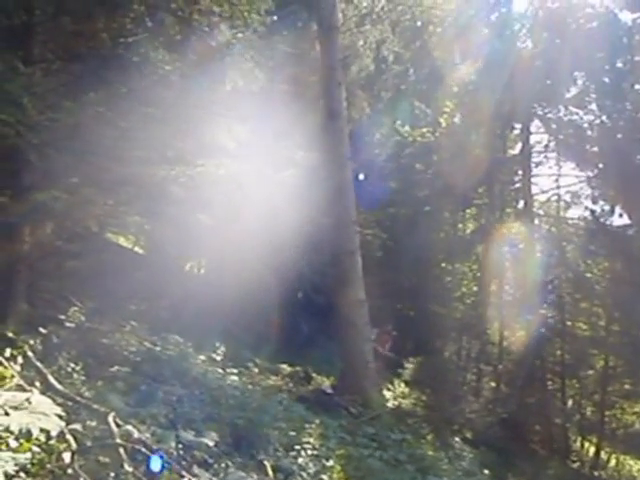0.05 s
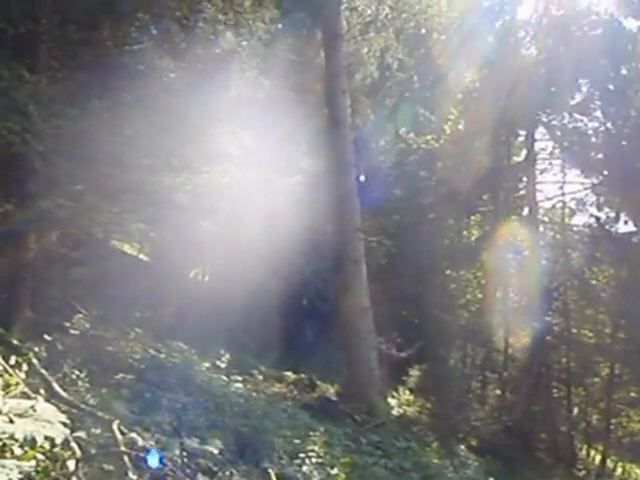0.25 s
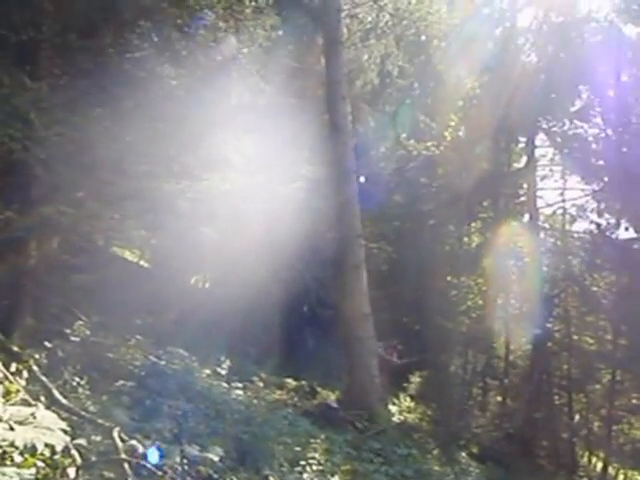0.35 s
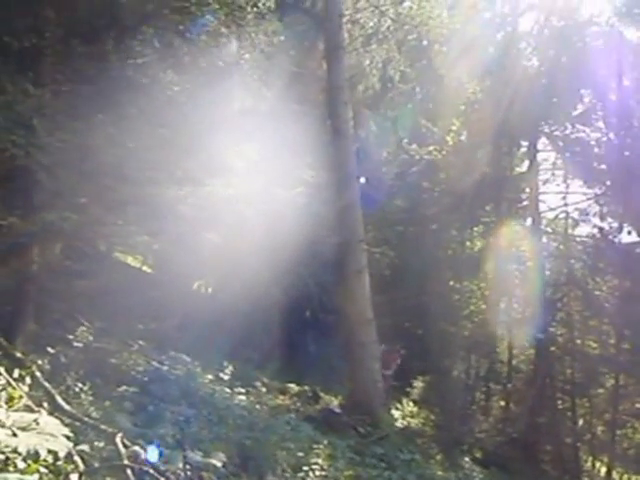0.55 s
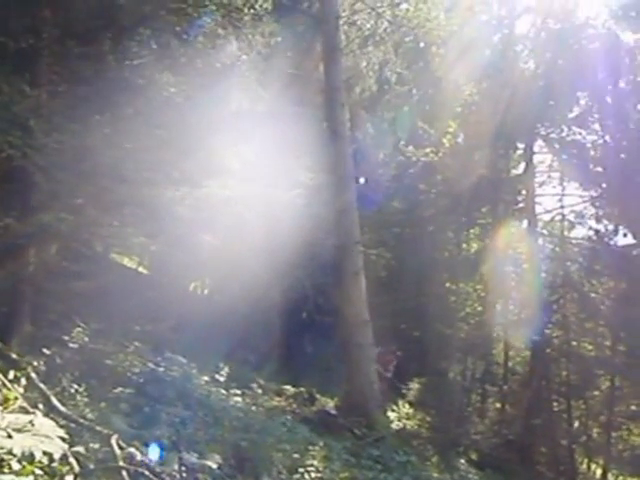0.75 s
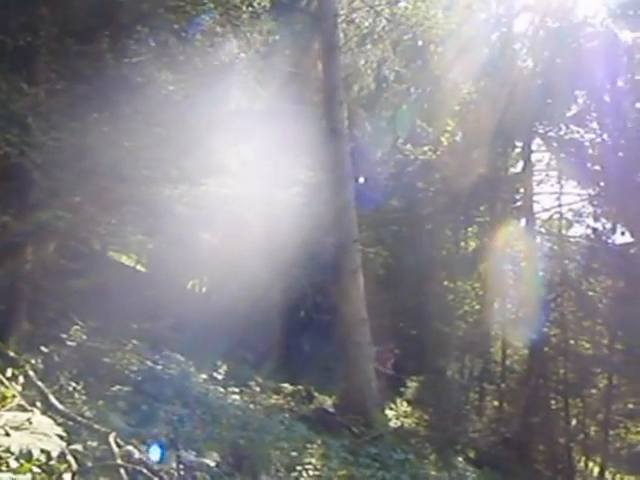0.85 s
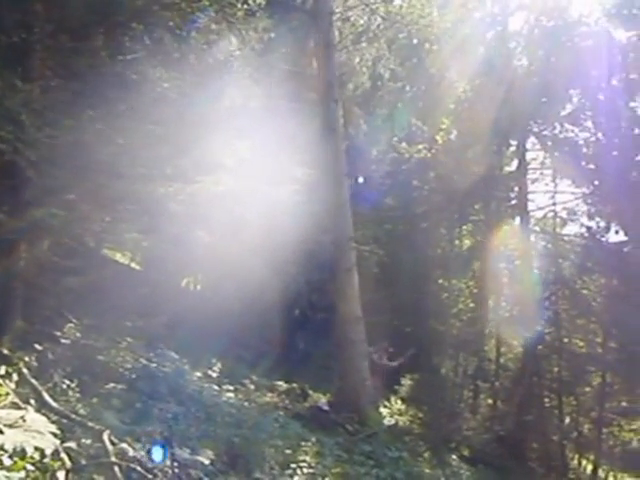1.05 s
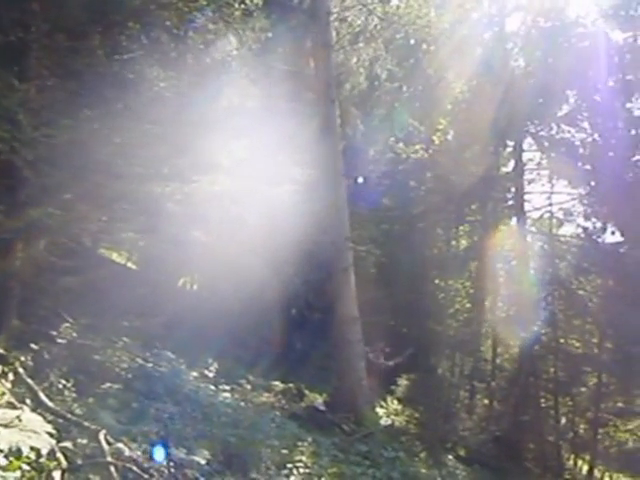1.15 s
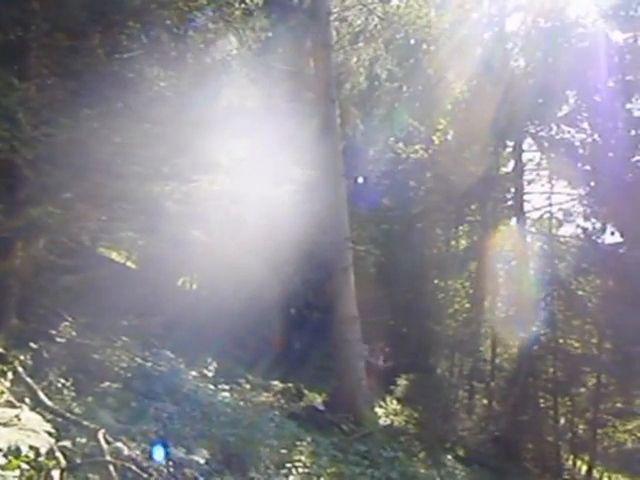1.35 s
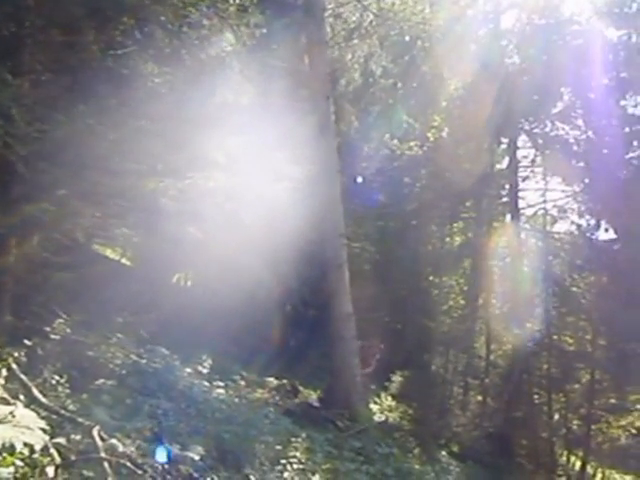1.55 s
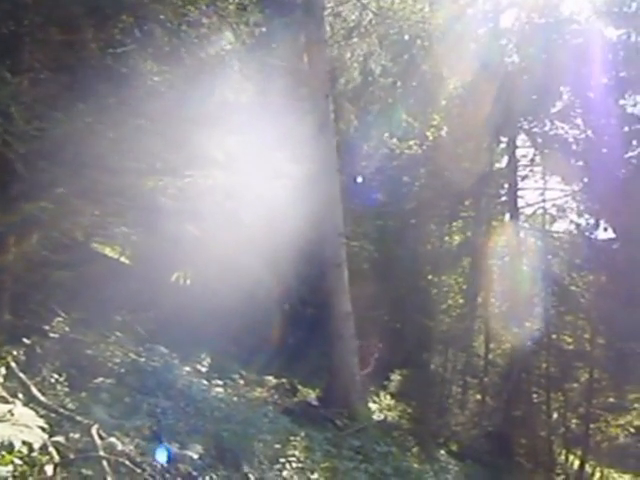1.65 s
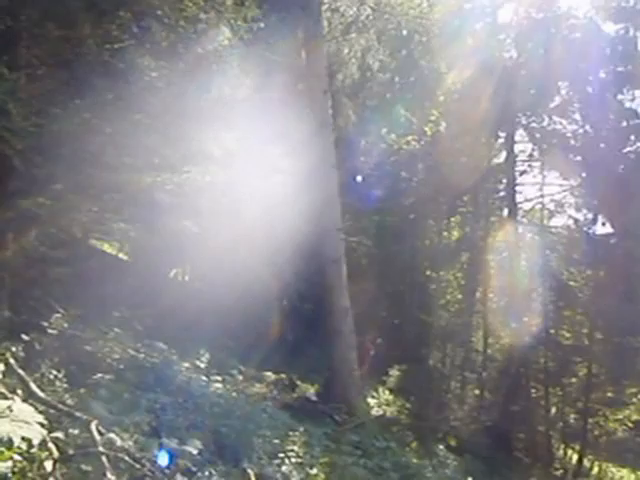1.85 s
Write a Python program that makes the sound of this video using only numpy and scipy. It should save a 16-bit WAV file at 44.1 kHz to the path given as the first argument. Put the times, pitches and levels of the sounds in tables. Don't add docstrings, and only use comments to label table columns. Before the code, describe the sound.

A hard, clipped knock close on the microphone, then a fainter wooden knock far off in woods

```python
import sys
import numpy as np
from scipy import signal
from scipy.fft import rfft, irfft
from scipy.io import wavfile
from scipy.ndimage import uniform_filter1d

SR = 44100
rng = np.random.default_rng(int(sys.argv[2]) if len(sys.argv) > 2 else 0)


def volts_from_decibels(level):
    exponent = np.asarray(level, float) / 20
    return 10 ** exponent


def transcribe(u):
    v = np.clip(np.atleast_2d(u).T, -1, 1)
    q = np.round(v * 32767).astype(np.int16)
    wavfile.write(sys.argv[1], SR, q)


N = 83790

# f/Hz, level/dB
HISS_SPECTRUM = [(20, -4), (120, 1.6), (280, -3), (500, -8), (950, -4), (1500, -5), (3000, 0), (4000, 3)]
HISS_DB = -59.5

# start t/s, length t/s, f/Hz, level/dB
BIRD_NOTE = (1.699, .028, 2670, -57)

# f/Hz, level/dB
TREE_SPECTRUM = [(300, -21.5), (900, -1), (2000, 0), (3500, -12)]
TREES_T60_S = 1.2

# f/Hz, level/dB, t60/s
WOOD_MODES = [(720, -12, .015), (995, -1, .018), (1339, -2, .0045), (1935, -7, .017), (3135, -15, .012),
              (3430, -12, .011)]

# t/s, level/dB
BLOW_ARRIVALS = [
    (1.0623, -30),
    (1.06273, -18),
    (1.06344, -21),
    (1.06551, -30),
    (1.06787, -36),
    (1.07487, -35),
    (1.07597, -40),
]

# t/s, height/full scale, rise t/s
PRESSURE_STEPS = [
    (.24547, 2.07, .00009),
    (.24716, -2.12, .00011),
]

# t/s, height/full scale, length t/s, f/Hz
HOUSING_FLEXES = [
    (.1940, .002, .0016, 0),
    (.24500, -.33, .00016, 1700),
    (.24554, .09, .00006, 0),
    (.24693, .24, .00008, 0),
    (.24618, .06, .0001, 0),
    (.2662, .011, .0013, 0),
    (.2742, -.009, .001, 0),
    (1.355, .001, .0012, 0),
    (1.568, .001, .0012, 0),
]

CONVERTER_STEP = 0.69 / 128


def coloured(points):
    f, level_db = np.transpose(points)
    hz = np.fft.rfftfreq(N, 1 / SR)
    gain = volts_from_decibels(np.interp(np.log(hz + 1), np.log(f), level_db))
    in_band = (hz < 4000) * (hz > 8)
    noise = irfft(rfft(rng.standard_normal(N)) * gain * in_band, N)
    return noise / np.sqrt(np.mean(noise ** 2))


def hiss():
    return volts_from_decibels(HISS_DB) * coloured(HISS_SPECTRUM)


def tree_wash(start_s, level_db):
    since = np.arange(N) / SR - start_s
    decay_db = level_db - 60 * np.maximum(since, 0) / TREES_T60_S
    return (since > 0) * volts_from_decibels(decay_db) * coloured(TREE_SPECTRUM)


def bird():
    start, length, hz, db = BIRD_NOTE
    t = np.arange(N) / SR
    progress = np.clip((t - start) / length, 0, 1)
    return volts_from_decibels(db) * np.sin(np.pi * np.sqrt(progress)) * np.sin(2 * np.pi * hz * t)


def far_blow():
    t = np.arange(2048) / SR
    ring = -sum(volts_from_decibels(db - 60 * t / t60) * np.sin(2 * np.pi * hz * t) for hz, db, t60 in WOOD_MODES)
    ring = signal.lfilter(*signal.butter(3, 500, "high", fs=SR), ring)
    arrivals = np.zeros(N)
    for s, db in BLOW_ARRIVALS:
        arrivals[round(s * SR):][:len(t)] += volts_from_decibels(db) * ring
    through_air = signal.filtfilt(*signal.butter(3, (400, 3750), "band", fs=SR), arrivals)
    return through_air + tree_wash(BLOW_ARRIVALS[-1][0], -60)


def knock():
    t = np.arange(N) / SR
    pressure = sum(h * 0.5 * (1 + np.tanh((t - s) / (2 * rise))) for s, h, rise in PRESSURE_STEPS)
    coupling_hz, ceiling = 82, 0.91
    sagged = signal.lfilter(*signal.butter(2, coupling_hz, "high", fs=SR), pressure)
    flex = np.zeros(N)
    for s, height, width, hz in HOUSING_FLEXES:
        bump = np.exp(-0.5 * ((t - s) / width) ** 2)
        flex += height * bump * np.cos(2 * np.pi * hz * (t - s))
    return np.minimum(sagged, ceiling) + flex + tree_wash(0.255, -62)


def scene():
    return (hiss() + bird() + far_blow() + knock())[None]


def converter(x):
    lead = 2
    slow = signal.resample_poly(x[lead:], 80, 441)
    offset_steps, scatter = -0.353, 0.075 / 128
    slow = CONVERTER_STEP * np.round(slow / CONVERTER_STEP + offset_steps)
    slow = slow + scatter * rng.standard_normal(len(slow))
    smooth = signal.firwin(8821, 4650, window=("kaiser", 5), fs=80 * SR)
    fast = np.append(np.zeros(lead), signal.resample_poly(slow, 441, 80, window=smooth))[:N]
    steps = np.round(128 * fast)
    return np.where(steps > 127, -128, np.maximum(steps, -128)) / 128


def grain(x):
    treble = signal.lfilter(*signal.butter(2, 4000, "high", fs=SR), x)
    level = np.sqrt(abs(uniform_filter1d(treble ** 2, size=round(0.008 * SR))))
    return volts_from_decibels(-22.5) * level ** 0.7 * rng.standard_normal(N)


def roll_off(x):
    return signal.sosfilt(signal.butter(12, 12590, fs=SR, output="sos"), x)


def record(dry):
    bits = converter(dry[0])
    mix = np.clip(bits + grain(bits), -1, 1)[None]
    return roll_off(mix)


dry = scene()
out = record(dry)
transcribe(out)
```